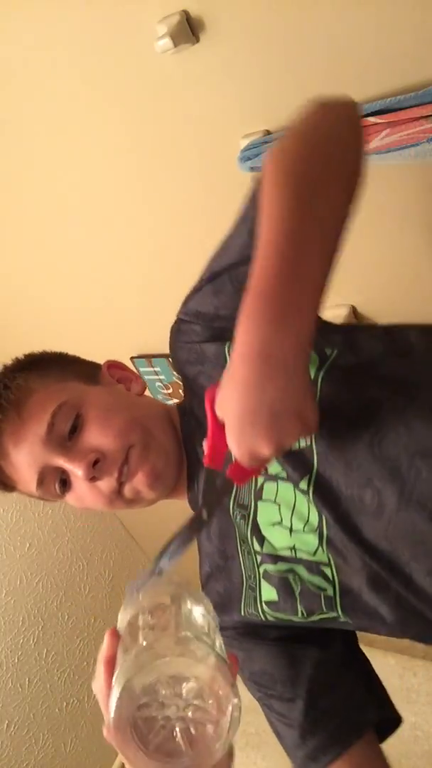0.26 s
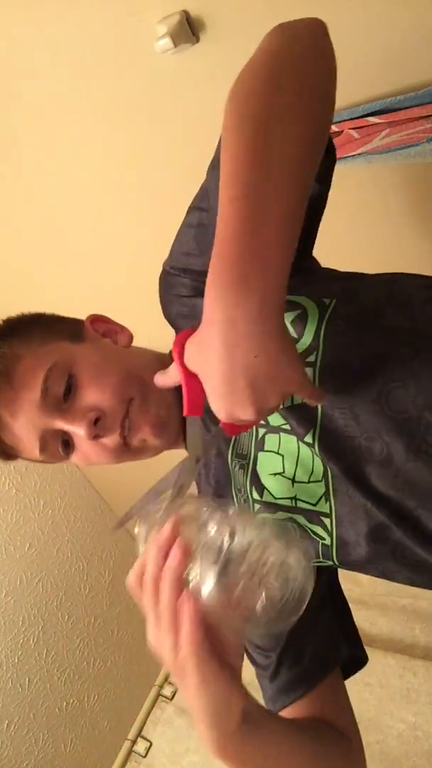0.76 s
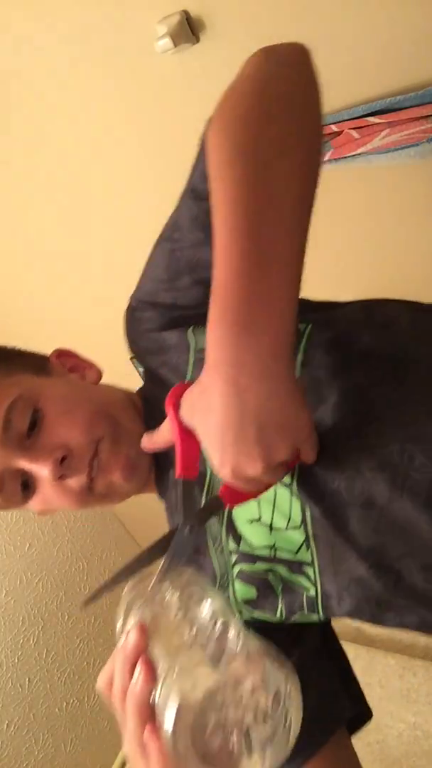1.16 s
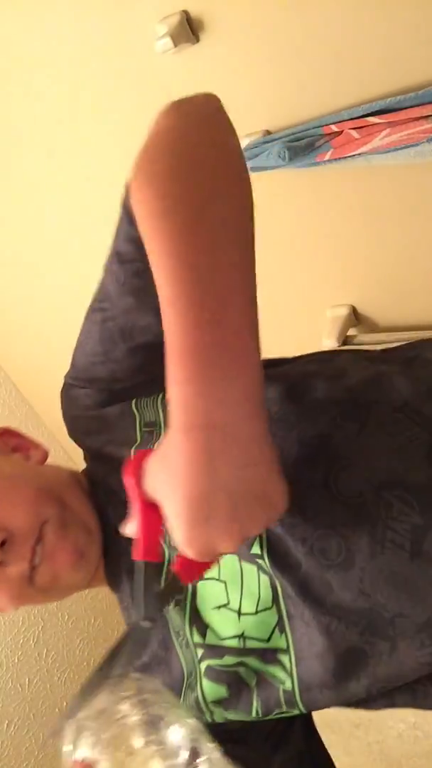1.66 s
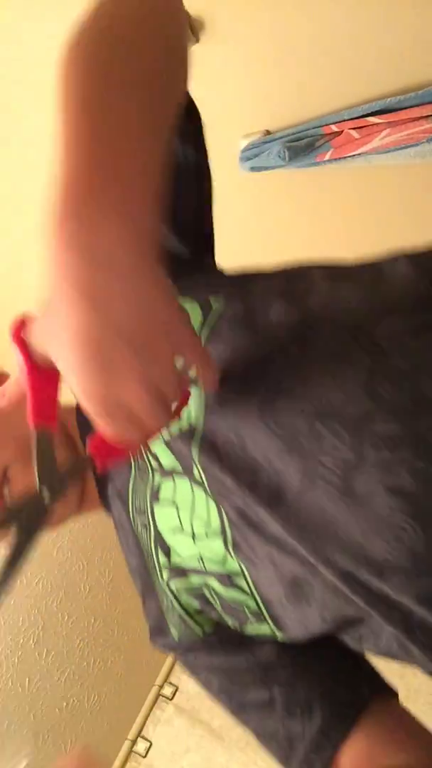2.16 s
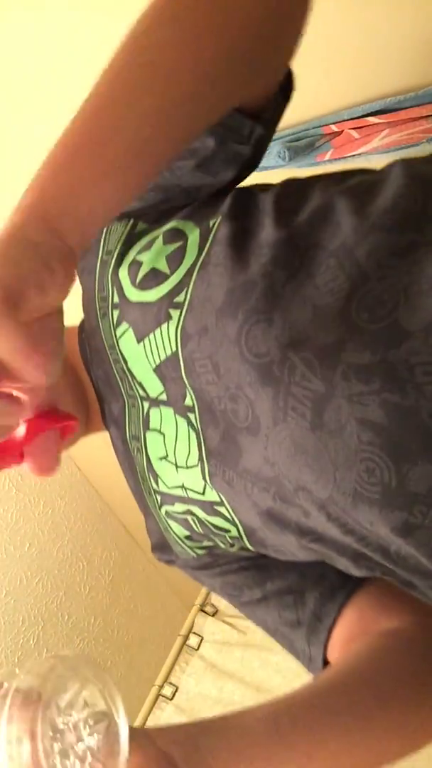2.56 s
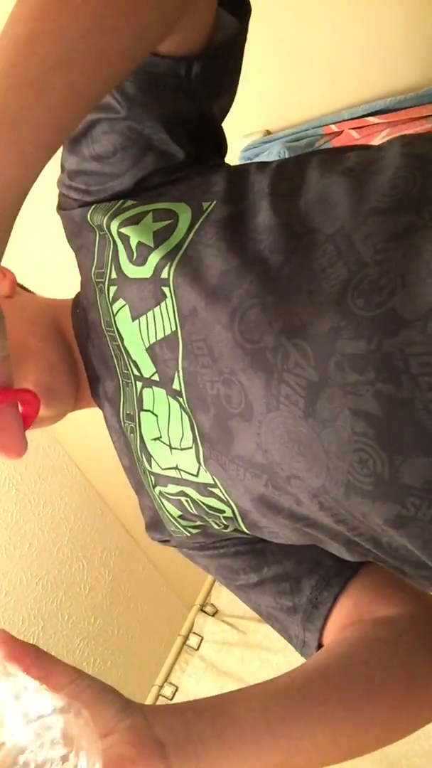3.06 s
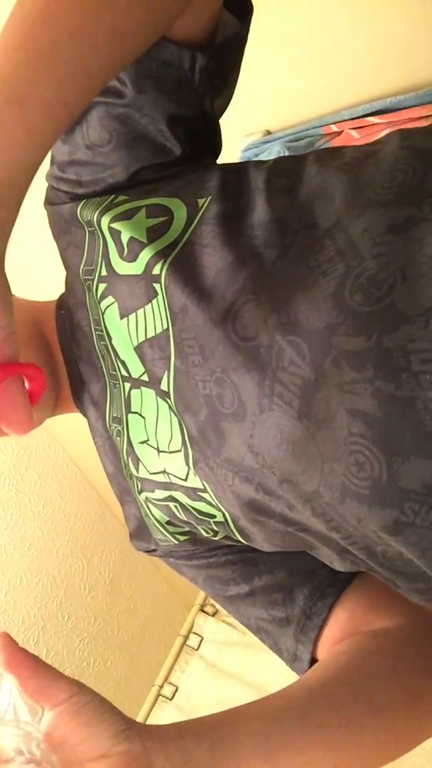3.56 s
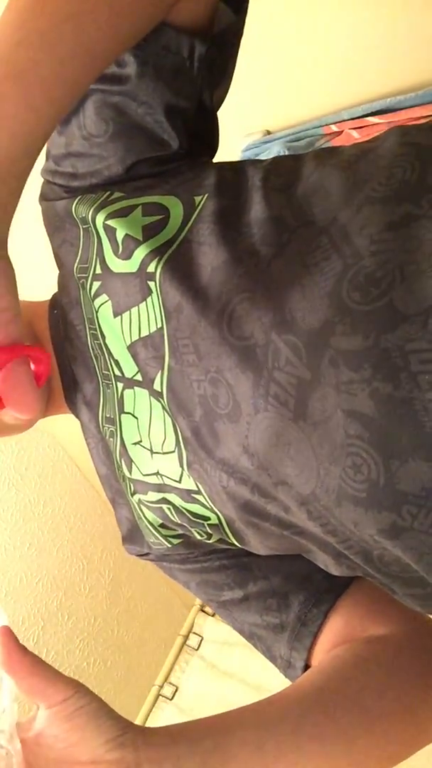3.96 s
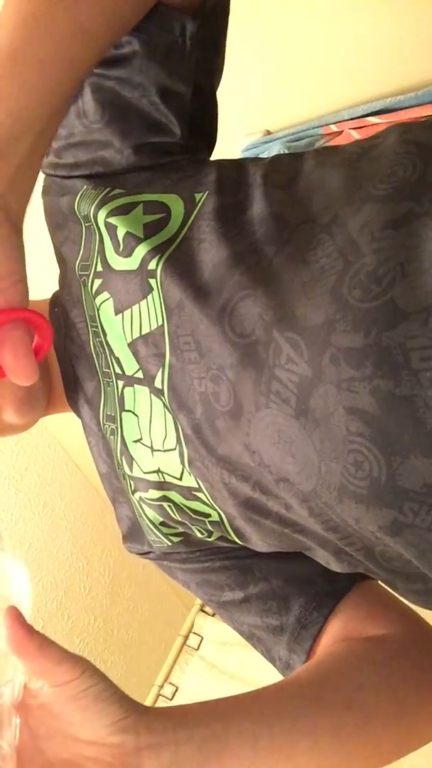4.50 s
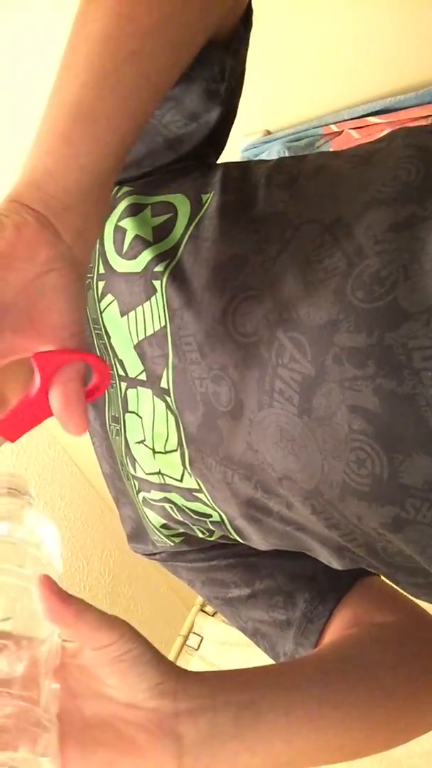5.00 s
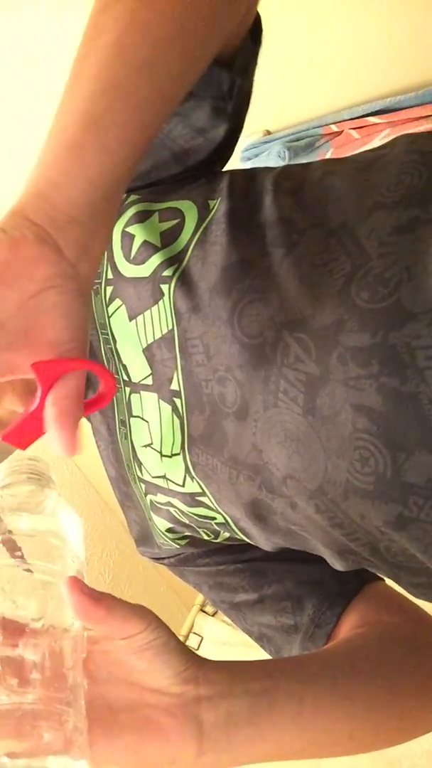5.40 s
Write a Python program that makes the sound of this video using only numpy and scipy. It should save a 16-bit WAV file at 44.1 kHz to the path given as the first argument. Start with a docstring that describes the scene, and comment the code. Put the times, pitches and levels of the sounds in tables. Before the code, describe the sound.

Blades grate and squeak on a thin plastic bottle while the squeezed wall creaks and pops at uneven moments. An early snap is piercing and nearly overloads the close microphone; busy crunching continues, then eases to isolated clicks. Late on, sharp crackles build to a second overloaded crack and trailing crinkles. The small hard-walled room adds a short tail; a faint wavering fan hums behind.

```python
"""Scissors cut into a thin plastic bottle, close by in a small room.
Each snap of the buckling wall is a noise crack with damped modes of the neck, shell and dented panel.
Between snaps, stick-slip noise scrapes, chips, squeaks and groans; small snaps crinkle the squeezed wall.
The blades tick as band-passed noise, and one stroke ends in a dull modal knock.
Behind them lie soft room noise and the low, wavering drone of a fan, as narrow bands of noise."""
import sys
import numpy as np
from scipy import signal
from scipy.fft import rfft, irfft
from scipy.io import wavfile
from scipy.ndimage import uniform_filter1d

SR = 44100
rng = np.random.default_rng(int(sys.argv[2]) if len(sys.argv) > 2 else 0)


def master_out(mix):
    """Clip the mix to full scale and print it as 16-bit PCM to the path in sys.argv[1]."""
    frames = np.transpose(np.atleast_2d(mix))
    ceiling = np.clip(frames, -1, 1)
    pcm = np.round(ceiling * 32767).astype(np.int16)
    wavfile.write(sys.argv[1], SR, pcm)


N = 248724  # length [samples]


def amp(db):
    """Level law: decibels to amplitude gain."""
    return 10 ** (np.asarray(db) / 20)


def unit(x):
    """Power normalization: scales to an rms of one."""
    return x / np.sqrt(np.mean(x ** 2) + 1e-20)


def burst(x):
    """Energy normalization: scales a hit to the energy of 12 ms at an rms of one."""
    return x * np.sqrt(.012 * SR / (np.sum(x ** 2) + 1e-20))


def read(points, hz):
    """Logarithmic frequency scale: joins points by straight lines over log frequency."""
    f, value = np.transpose(points)
    return np.interp(np.log(hz + 1), np.log(f + 1), value)


def add(mix, s, sound):
    """Superposition: mixes a sound in at s seconds."""
    part = mix[max(round(s * SR), 0):][:len(sound)]
    part += sound[:len(part)]


def colour(x, spectrum, centre_hz=4000, bump_db=0, size=2048):
    """Minimum-phase filtering: a causal filter with the given spectrum and a bump at its centre."""
    hz = abs(np.fft.fftfreq(size, 1 / SR))
    octaves = np.log2((hz + 1) / centre_hz)
    bump = bump_db * np.exp(-(octaves / 0.23) ** 2)
    log_gain = np.log(amp(read(spectrum, hz) + bump))
    # the Hilbert transform of the log gain gives the phase
    taps = np.fft.ifft(np.exp(np.conj(signal.hilbert(log_gain)))).real
    return signal.oaconvolve(x, taps[:size // 2])[:len(x)]


def ring(modes, t, pitch=1, scatter=0., rise=0.00039):
    """Modal synthesis: dying sines; the object's shape, and so each mode, differs from blow to blow."""
    hz, db, t60 = np.transpose(modes)[:, :, None]
    detune, phase = rng.uniform(-1.183, 1, (2, len(modes), 1))
    clock = np.cumsum(pitch * np.ones(len(t))) / SR  # the pitch may glide
    waves = np.sin(2 * np.pi * hz * (1 + scatter * detune) * clock + np.pi * phase)
    decay = np.exp(-np.log(1000) * t / t60)
    onset = 1 - np.exp(-t / rise)
    return burst((amp(db) * decay * waves).sum(0) * onset)


def narrow_noise(centre, width, size=N):
    """Resonance: noise held in one peak, of this width at half amplitude [Hz], is a wavering tone."""
    hz = np.fft.rfftfreq(size, 1 / SR)
    resonance = 1 / (1 + (2 * (hz - centre) / width) ** 2)
    return unit(irfft(rfft(rng.standard_normal(size)) * resonance, size))


def fracture(t, fall, flutter_db, flutter_fall, rise=0.0009):
    """Brittle fracture: a quick run of tiny breaks, then the weaker flutter of the freed film."""
    breaks = np.exp(-(t / fall) ** 2)
    flutter = amp(flutter_db) * np.exp(-t / flutter_fall)
    return rng.standard_normal(len(t)) * (1 - np.exp(-t / rise)) * (breaks + flutter)


# Reverberation time of the room: (frequency [Hz], t60 [s])
REVERBERATION = [(250, 0.29), (660, .35), (1700, 0.25), (4500, 0.23), (8000, .25), (15000, 0.16)]
# Standing waves between the walls: (frequency [Hz], relative level [dB], t60 [s])
STANDING_WAVES = [(304, 6, 0.38), (397, -7, 0.17), (438.9, -5, 0.75), (573, -2.5, 0.083), (648, -1.5, 0.55),
                  (713, -3.5, 0.18), (949, -12, .2)]


def reflections(bass_db=1.5, walls_db=-20, size=16384):
    """Reverberation: exponentially dying noise with standing waves, at an energy of one."""
    hz, frames, z = signal.stft(rng.standard_normal(size), SR, nperseg=256)
    t60, t = read(REVERBERATION, hz)[:, None], np.arange(size) / SR
    bass = amp(bass_db / (1 + (hz[:, None] / 900) ** 2))
    z = z * np.exp(-np.log(1000) * frames / t60) * bass
    tail = signal.istft(z, SR, nperseg=256)[1][:size]
    tail *= np.clip(t / 0.0026 - .5, 0, 1)  # the first reflections take a few ms
    waves = unit(ring(STANDING_WAVES, t, rise=.008))
    return unit(unit(tail) + amp(walls_db) * waves) / np.sqrt(size)


def room(wet_db, echo_s=0.007, echo_db=-13):
    """Impulse response: the direct sound, one near echo and the tail."""
    response = amp(wet_db) * reflections()
    response[0] += 1
    response[round(echo_s * SR)] += amp(echo_db)
    return response


def heard(x, response, db):
    """Convolution: a hit through the room, scaled with its reverberation to the given level."""
    return amp(db) * burst(signal.fftconvolve(x, response))


# Spectrum of the room noise: (frequency [Hz], relative density [dB per Hz])
AIR_SPECTRUM = [(25, -36.5), (60, -26.5), (110, -21), (150, -12.5), (190, -10.5), (250, -7.5), (320, -10),
                (430, -14.5), (600, -20.5), (800, -32.5), (1300, -29.5), (2000, -38.5), (4000, -40.5),
                (17000, -55)]


def air(level_db=-52.5):
    """Stationary noise: white noise shaped to the soft noise of the room."""
    hz = np.fft.rfftfreq(N, 1 / SR)
    shaped = rfft(rng.standard_normal(N)) * amp(read(AIR_SPECTRUM, hz))
    return amp(level_db) * unit(irfft(shaped, N))


# Tones of the fan: (frequency [Hz], width [Hz], level [dB])
FAN_TONES = [(126.2, 8.1, -63.5), (182.6, 8.8, -56), (209, 8.6, -57.5)]


def fan():
    """Narrow-band noise: the fan's low drone wavers because each tone has a width."""
    return sum(amp(db) * narrow_noise(centre, width) for centre, width, db in FAN_TONES)


SWELL_DB = 20  # level change over each rise or fall time [dB]


def swell(strokes):
    """Exponential envelope: each stroke builds to its peak and relaxes at steady rates in dB."""
    t = np.arange(N) / SR
    level = 0
    for s, db, rise, fall in strokes:
        drop = SWELL_DB * np.maximum((s - t) / rise, (t - s) / fall)
        level = level + amp(db - drop)
    return level


def rub(strokes, spectrum, slips_per_s, spread_db, smooth, patchy_db):
    """Stick and slip: tiny clicks over a hiss, whose colour shifts as the point of contact moves."""
    strength = amp(spread_db * np.minimum(rng.exponential(1, N), 4))
    slips = (rng.random(N) < slips_per_s / SR) * rng.standard_normal(N) * strength
    z = signal.stft(unit(slips) + smooth * rng.standard_normal(N), nperseg=256)[2]
    patches = uniform_filter1d(rng.standard_normal(z.shape), size=4, axis=0)  # over frequency
    patches = unit(uniform_filter1d(patches, size=14, axis=1))  # over time
    patchy = signal.istft(z * amp(patchy_db * patches), nperseg=256)[1][:N]
    return unit(colour(patchy, spectrum)) * swell(strokes)


# The hand squeezes the bottle: (peak time [s], relative groan level [dB], rise [s], fall [s])
HAND_SQUEEZES = [(.12, -43, 0.24, 0.43), (.88, -37.5, .6, 0.13), (1.8, -34.5, .55, 0.19),
                 (2.15, -38, 0.53, 0.24), (3.46, -52, 0.13, 0.12), (4.87, -25.5, 0.012, .11),
                 (5.21, -42.5, 0.035, 0.091), (5.62, -37.5, 0.099, .5)]
# Spectrum of the flexing wall: (frequency [Hz], relative density [dB per Hz])
FLEX_SPECTRUM = [(50, -17.5), (150, -22), (260, -7.5), (340, 0.5), (460, 0.5), (600, -11.5), (850, -14.5),
                 (1300, -13), (1800, -19.5), (3000, -47)]


def squeeze():
    """Stick and slip in a flexing wall: uneven slips make the groan of the squeezed bottle."""
    return amp(-5.5) * rub(HAND_SQUEEZES, FLEX_SPECTRUM, slips_per_s=210, spread_db=3.0,
                           smooth=.6, patchy_db=3.5)


# The blades stick and squeak on the film: (time [s], length [s], frequency [Hz], level [dB])
BLADE_SQUEAKS = [(0.0, 0.059, 1356, -49.5), (0.679, 0.0099, 1350, -30.5), (2.19, 0.038, 2100, -44)]


def squeak(width_hz=160):
    """Frictional resonance: each squeak is a short, narrow band of noise."""
    out = np.zeros(N)
    for s, length, hz, db in BLADE_SQUEAKS:
        count = round(length * SR)
        tone = narrow_noise(hz, width_hz, size=count) * np.hanning(count)
        add(out, s, amp(db) * unit(tone))
    return out


# The blades slide on the plastic: (peak time [s], relative hiss level [dB], rise [s], fall [s])
BLADE_SCRAPES = [(.12, -35, 0.11, 0.11), (.25, -50.5, 0.14, 0.22), (.92, -39.5, 0.45, 0.032),
                 (1.6, -49, 0.18, 0.19), (1.74, -42, 0.026, 0.0106), (2.225, -28, 0.12, 0.042),
                 (3.455, -56, 0.091, 0.079), (4.62, -39.5, 0.08, 0.03)]
# Spectrum of the scrape: (frequency [Hz], relative density [dB per Hz])
SCRAPE_SPECTRUM = [(200, -25.5), (500, 6.5), (900, -2), (1350, 9), (1750, -1.5), (2150, 5.5), (2700, -0.5),
                   (3800, -0.5), (5000, -5.5), (7000, -4.5), (10500, -23), (13000, -16), (17000, -25.5)]
# Spectrum of cracking film, also used for chips and ticks: (frequency [Hz], relative density [dB per Hz])
CRACK_SPECTRUM = [(150, -27.5), (500, -12), (1500, -6.5), (2500, -6.5), (3500, -2), (5000, -4.5),
                  (7000, -1), (8500, -10), (10000, -16), (16000, -28)]


def scrape():
    """Sliding friction: dense slips hiss while sparser ones chip the film under the blade edge."""
    slide = amp(-3.5) * rub(BLADE_SCRAPES, SCRAPE_SPECTRUM, slips_per_s=700, spread_db=0.5,
                            smooth=1.0, patchy_db=3.0)
    grit = amp(-9.5) * rub(BLADE_SCRAPES, CRACK_SPECTRUM, slips_per_s=130, spread_db=0.5,
                           smooth=.1, patchy_db=5)
    return slide + grit


def friction():
    """Linear superposition: scrapes, squeezes and squeaks share one room response."""
    return signal.oaconvolve(scrape() + squeeze() + squeak(), room(wet_db=-5.5))[:N]


# The blades touch: (time [s], ring frequency [Hz], ring level [dB], click level [dB])
BLADE_TICKS = [(2.8433, 6360, -45.5, -45.5), (4.7073, 6833, -47, -62)]


def ticks(t, response):
    """Impact excitation: a brief contact clicks and drives a narrow ring of steel on steel."""
    out = np.zeros(N)
    for s, hz, ring_db, click_db in BLADE_TICKS:
        touch = fracture(t, fall=0.00084, flutter_db=-16.0, flutter_fall=.005)
        band = signal.butter(2, [hz * .83, hz * 1.04], "band", fs=SR, output="sos")
        steel = signal.sosfilt(band, touch)
        click = colour(touch, CRACK_SPECTRUM, 10000, bump_db=4.5)
        add(out, s, heard(steel, response, ring_db) + heard(click, response, click_db))
    return out


# The blades break through and the handles meet: (time [s], level [dB], pitch factor [ratio])
HANDLE_KNOCKS = [(1.748, -10.5, 1.12), (1.7622, -15.5, .95)]
# Modes of the knock: (frequency before the pitch factor [Hz], relative level [dB], t60 [s])
KNOCK_MODES = [(286.3, -2.5, 0.22), (472, 12, 0.052), (560, 0.5, 0.15), (710, 12, 0.018),
               (810, 14.5, 0.016), (1023, 3, 0.012), (1175, -9, 0.065)]


def knocks(t, response):
    """Modal impact: low, quickly damped modes make the dull knock at the end of a stroke."""
    out = np.zeros(N)
    for s, db, pitch in HANDLE_KNOCKS:
        add(out, s, heard(ring(KNOCK_MODES, t, pitch, rise=.0015), response, db))
    return out


def scissors(size=8000):
    """Linear superposition: the ticks and knocks of the scissors share one room response."""
    t, response = np.arange(size) / SR, room(wet_db=-9)
    return ticks(t, response) + knocks(t, response)


# most per second, random spread either way [dB], least squeeze level that crinkles [dB]
CRINKLES_PER_S, CRINKLE_SPREAD_DB, CRINKLE_FROM_DB = 24, 2, -56


def crinkles(count=400):
    """Buckling under load: small snaps at uneven times, as strong as the squeeze at that moment."""
    effort, rows = swell(HAND_SQUEEZES), []
    offsets = np.array([1, -22, -7, 1])  # crack, edge, shell, pop: relative to the squeeze [dB]
    for k, (when, *luck) in enumerate(rng.random((count, 5))):
        s = (k + when) / CRINKLES_PER_S
        if s * SR < N and effort[int(s * SR)] > amp(CRINKLE_FROM_DB):
            db = 20 * np.log10(effort[int(s * SR)])
            spread = CRINKLE_SPREAD_DB * (2 * np.array(luck) - 1)
            rows.append((s, *(db + offsets + spread)))
    return rows


def tear(t, give):
    """Diffuse-field excitation: the walls hear the crack from all sides, so its tail is even."""
    out = amp(-4.5) * burst(reflections())
    crack = fracture(t, fall=0.002 + 0.93 * give, flutter_db=-13.5, flutter_fall=0.012, rise=give)
    add(out, 0, burst(crack))
    return out


# The wall snaps, in levels relative within each column:
# (time [s], crack level [dB], sharp edge level [dB], shell ring level [dB], panel pop level [dB])
WALL_SNAPS = [(0.4153, -21.5, -66, -29.5, -27), (0.606, -21.5, -46, -38.5, -30.5),
              (0.6915, 1, -20, -18, -20), (0.7575, -29, -37.5, -28.5, -27.5), (0.8168, -30, -55, -55, -24),
              (0.91, -23, -39.5, -36.5, -25), (1.2299, -22.5, -58, -22.5, -25),
              (1.4177, -34.5, -52, -51, -31), (1.4656, -35.5, -70, -41, -32),
              (1.51, -24, -48, -34.5, -27.5), (1.5757, -25, -58, -36.5, -24),
              (1.6706, -17.5, -33.5, -33.5, -46), (1.707, -18.5, -35, -34.5, -30),
              (1.8305, -26.5, -36.5, -31, -28), (1.9005, -15.5, -35, -17, -28.5),
              (2.0571, -19, -54, -29.5, -23), (2.2518, -14, -59.5, -26, -20.5),
              (3.0087, -31, -53.5, -40, -36), (3.2254, -40, -65, -52, -43.5),
              (3.48, -39, -70.5, -49.5, -46.5), (3.5749, -32.5, -51.5, -51.5, -45),
              (3.8816, -26, -49, -46, -36), (3.8977, -15, -40, -34, -51.5), (4.0968, -21, -56.5, -31, -34),
              (4.3764, -34.5, -72.5, -53.5, -55), (4.4338, -18.5, -44.5, -39, -45),
              (4.4445, -13, -31.5, -36, -33), (4.4623, -30.5, -38, -33, -29.5),
              (4.829, 2, -37.5, -18.5, -15.5), (4.9153, -15, -34.5, -22.5, -24),
              (4.9279, -20, -37.5, -33, -24.5), (5.1642, -19.5, -60, -33, -28),
              (5.5487, -36, -63, -38.5, -31.5), (5.5733, -28.5, -58.5, -33, -26.5),
              (5.6229, -23, -55, -33, -26)]
# Each new grip loads another part of the wall, which keeps its tuning until the next:
# (start time [s], crack centre [Hz], boost at that centre [dB], nominal panel pitch [Hz])
WALL_GRIPS = [(0, 3600, 11, 368), (.65, 4370, 3.5, 375), (1.1, 1205, 6.5, 344), (1.38, 3020, 10.5, 420.4),
              (2.0, 3700, 7.5, 440), (2.7, 6370, 4, 332), (3.1, 3430, 8.5, 398), (3.52, 6050, 6, 326.3),
              (4.0, 3460, 6, 415), (4.41, 7140, 8, 451), (4.7, 3530, 4, 437), (5.1, 3750, 9, 330)]
# Spectrum of the sharp edge of a crack: (frequency [Hz], relative density [dB per Hz])
EDGE_SPECTRUM = [(3000, -28.5), (8000, -17), (9500, 11), (10500, 11), (12000, 10), (15000, -3), (17500, -8)]
# Modes of the stiff neck and base: (nominal frequency [Hz], relative level [dB], t60 [s])
NECK_MODES = [(3110, -1, 0.094), (3410, -3.5, 0.097), (3888, -1, .09), (3744, -5.5, 0.067),
              (3775, -12.5, 0.055), (4120, -10.5, 0.025), (4550, 0, 0.054), (5900, -1.5, 0.056),
              (6340, -2.5, 0.058)]
# Modes of the ribbed shell: (nominal frequency [Hz], relative level [dB], t60 [s])
SHELL_MODES = [(908, -7.5, .03), (1185, -4, 0.042), (1310, -7.5, 0.091), (1400, -1.5, 0.03),
               (1600, -10.5, 0.028), (1830, -6, 0.022), (2191, 1.5, 0.012)]
# Modes of a dented panel: (nominal multiple of its pitch [ratio], relative level [dB], t60 [s])
PANEL_MODES = [(.8, -6, 0.052), (1, 4.5, 0.06), (1.2, -12, 0.075), (1.5, -5, 0.054), (1.85, -9, 0.032),
               (2.4, -8, 0.033)]


def snaps(events, pitch_spread, size=5000):
    """Snap-through buckling: each snap cracks the film, rings neck and shell and pops a panel in or out."""
    out, t = np.zeros(N), np.arange(size) / SR
    tighten = 1 + 0.15 * (.5 - np.exp(-t / 0.015))  # the panel's pitch rises as it pulls taut
    for s, crack_db, edge_db, shell_db, pop_db in events:
        grip = sum(s > later[0] for later in WALL_GRIPS[1:])
        _, crack_hz, boost_db, pop_hz = WALL_GRIPS[grip]
        pop_hz = pop_hz * np.exp(pitch_spread * rng.uniform(-0.91, 1))
        # a dull snap gives way gradually, a sharp one quickly [s]
        give = np.clip(.0004 * amp(-42 - edge_db), .0002, .0025)
        start = s - give / 2
        torn = tear(t, give)
        crack = colour(torn, CRACK_SPECTRUM, crack_hz, boost_db)
        add(out, start, amp(crack_db - 13.0) * burst(crack))
        add(out, start, amp(edge_db - 6.5) * burst(colour(torn, EDGE_SPECTRUM)))
        neck = ring(NECK_MODES, t, scatter=.003, rise=give)
        shell = ring(SHELL_MODES, t, scatter=.04, rise=0.0026)
        # the wide panel takes longer to move
        pop = ring(PANEL_MODES, t, pop_hz * tighten, scatter=0.076, rise=0.0036)
        response = room(wet_db=-3.5)  # the bottle moves between snaps
        add(out, start, heard(neck, response, crack_db - 21.5))
        add(out, start, heard(shell, response, shell_db - 3.0))
        add(out, start, heard(pop, response, pop_db + 0.64))
    return out


def scene():
    """Radiation efficiency: bottle and scissors, too small to radiate deep bass, over the room's air."""
    background = air() + fan()
    cutting = friction() + scissors()
    cutting += snaps(crinkles(), pitch_spread=.2) + snaps(WALL_SNAPS, pitch_spread=0.017)
    bass_cut = signal.butter(1, 110, "high", fs=SR, output="sos")  # edge in Hz
    return (signal.sosfilt(bass_cut, cutting) + background)[None]


def record(dry, cutoff_hz=17500):
    """Saturation: the loudest cracks overload the microphone; a low-pass then limits the band."""
    clipped = dry / (1 + dry ** 8) ** (1 / 8)
    band_limit = signal.firwin(255, cutoff_hz, window=("kaiser", 8), fs=SR)
    return signal.oaconvolve(clipped, band_limit[None], "same")


dry = scene()
out = record(dry)
master_out(out)
```